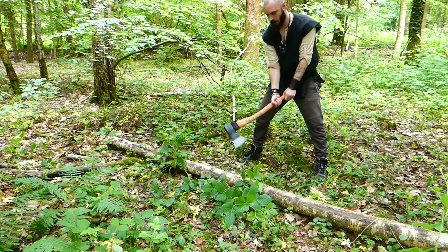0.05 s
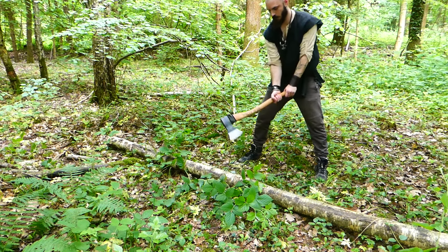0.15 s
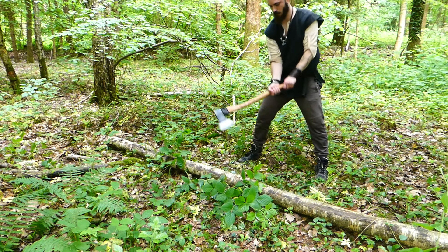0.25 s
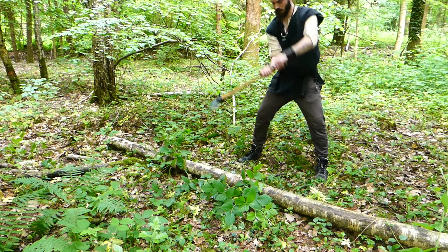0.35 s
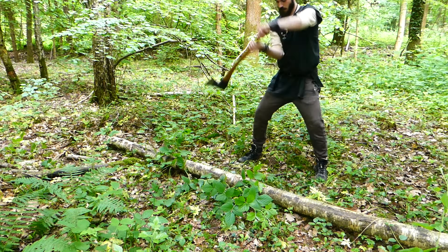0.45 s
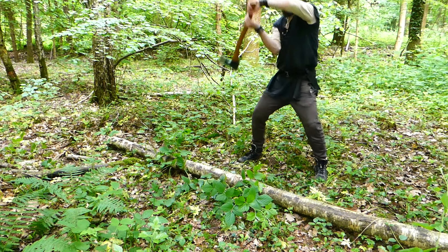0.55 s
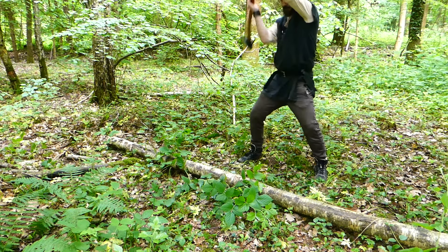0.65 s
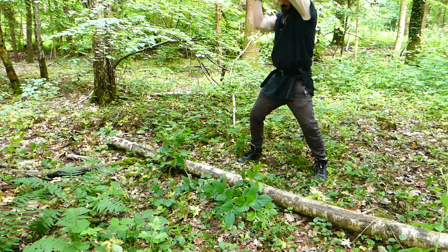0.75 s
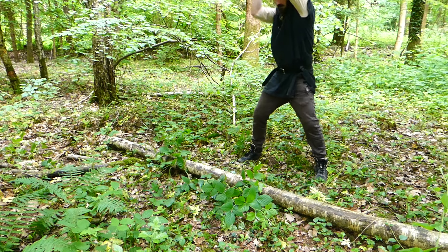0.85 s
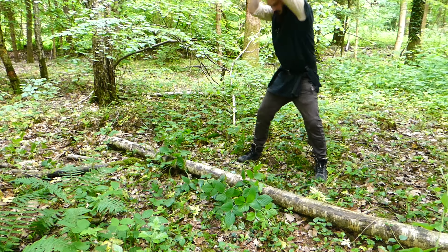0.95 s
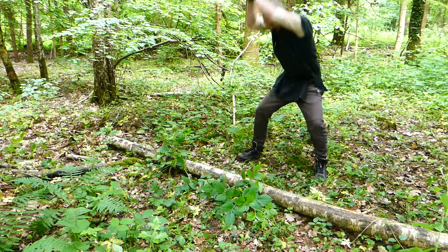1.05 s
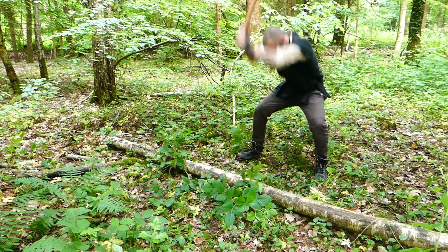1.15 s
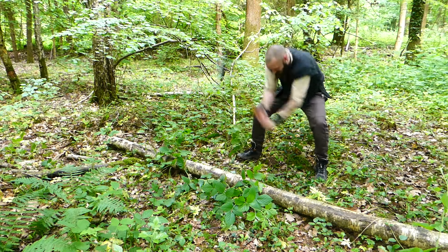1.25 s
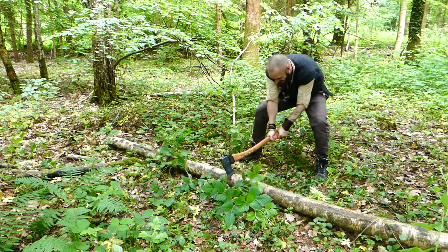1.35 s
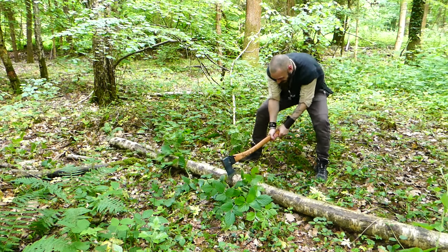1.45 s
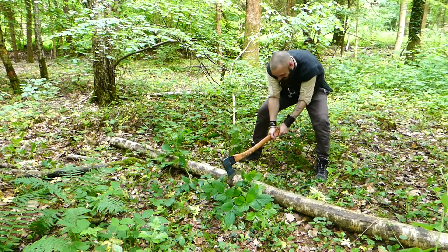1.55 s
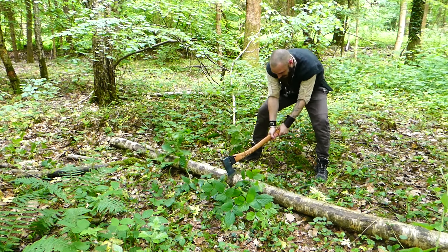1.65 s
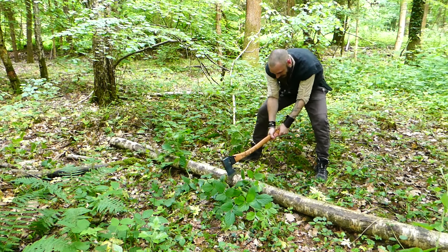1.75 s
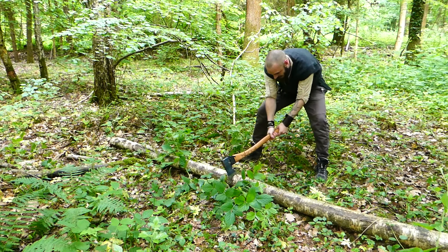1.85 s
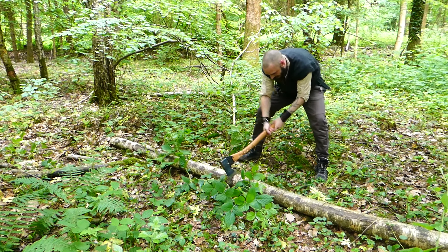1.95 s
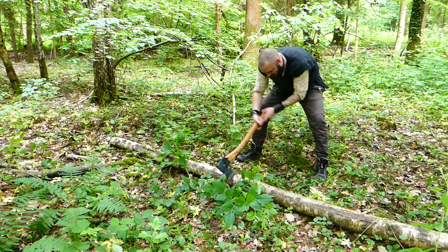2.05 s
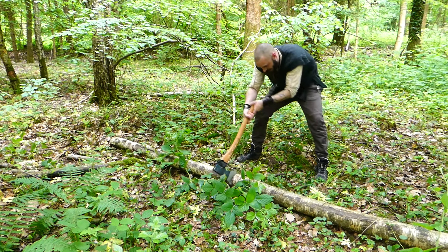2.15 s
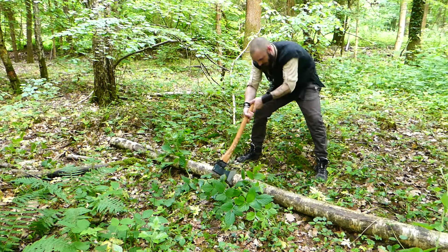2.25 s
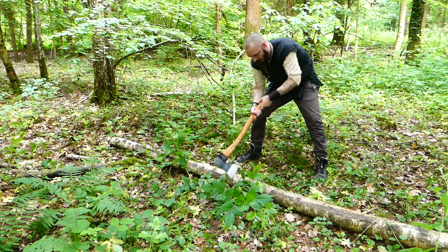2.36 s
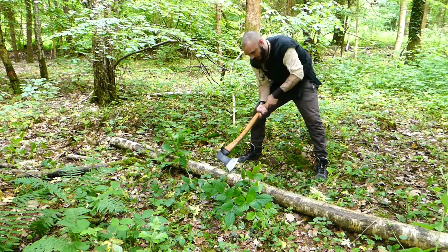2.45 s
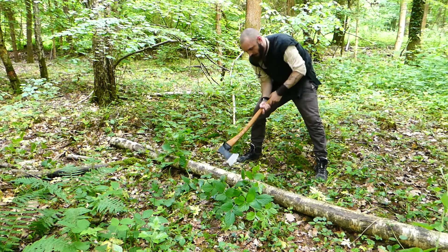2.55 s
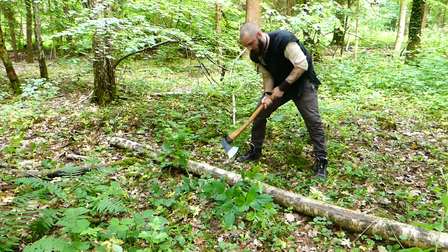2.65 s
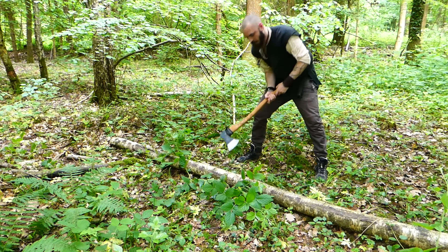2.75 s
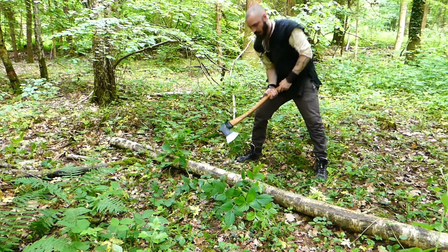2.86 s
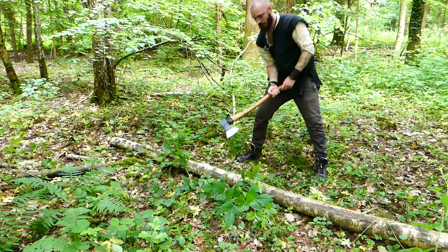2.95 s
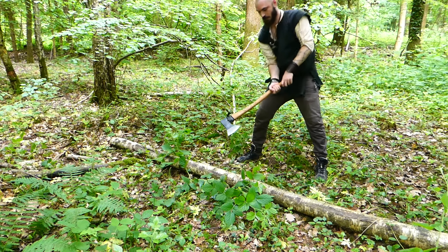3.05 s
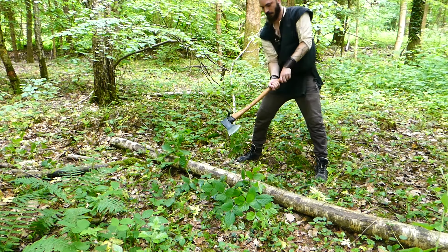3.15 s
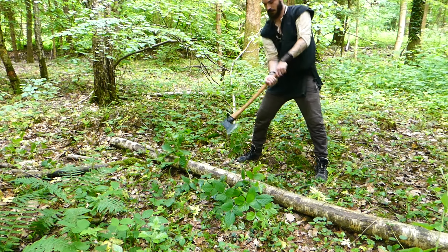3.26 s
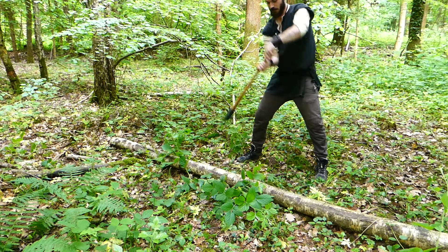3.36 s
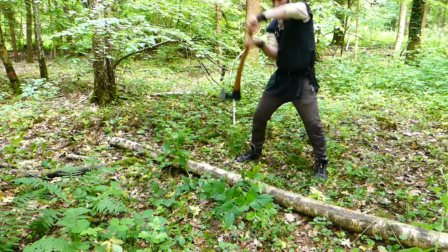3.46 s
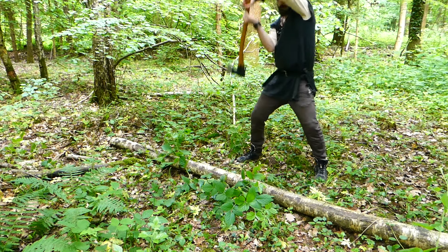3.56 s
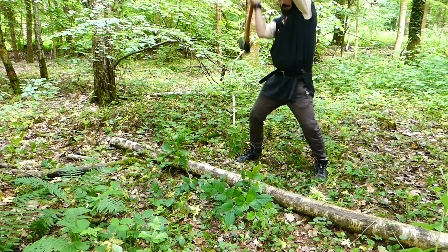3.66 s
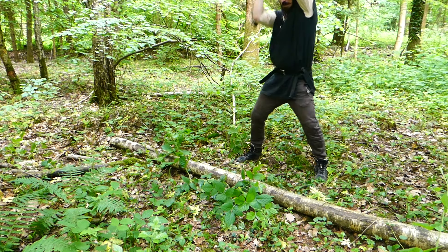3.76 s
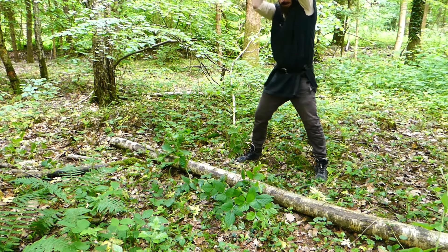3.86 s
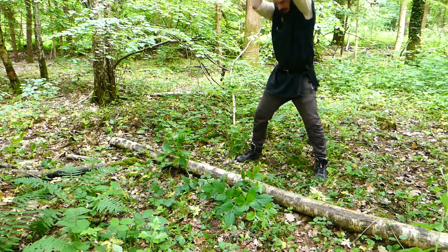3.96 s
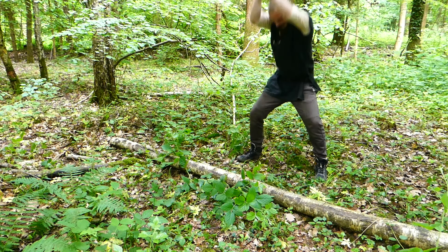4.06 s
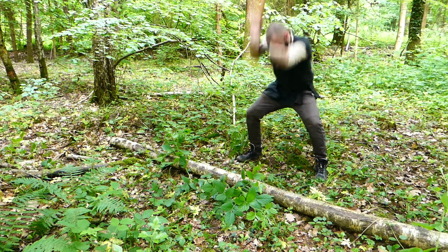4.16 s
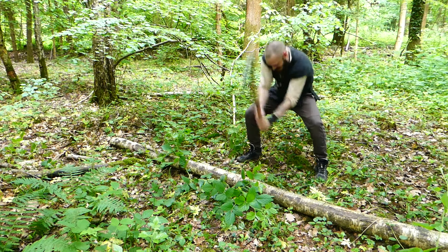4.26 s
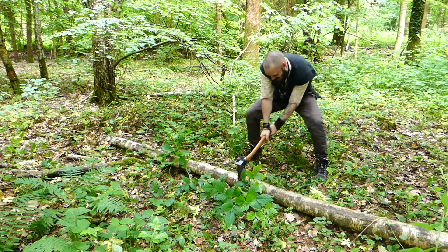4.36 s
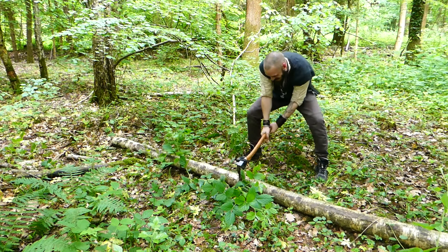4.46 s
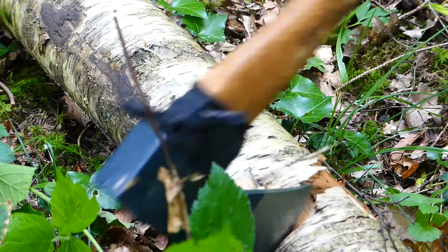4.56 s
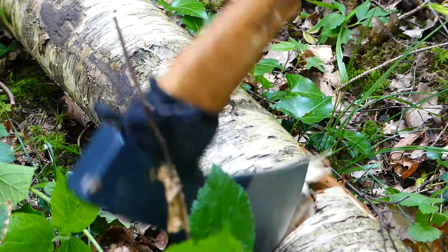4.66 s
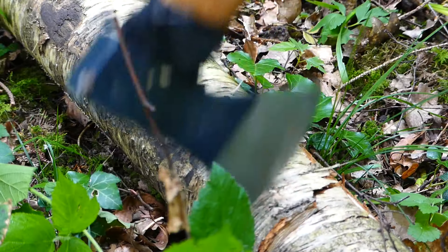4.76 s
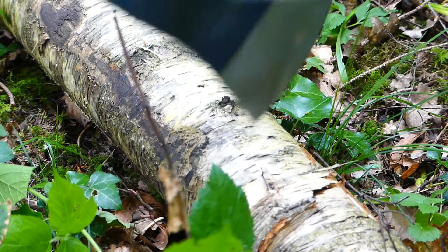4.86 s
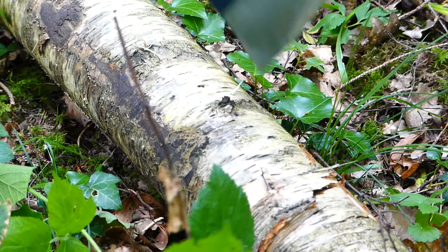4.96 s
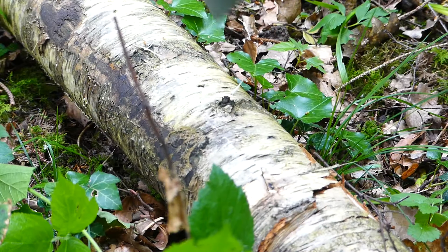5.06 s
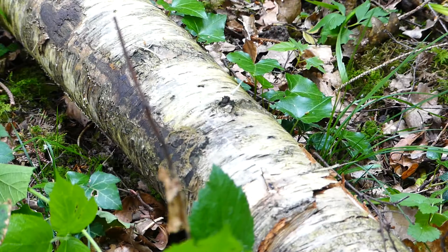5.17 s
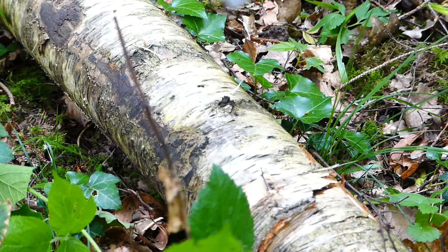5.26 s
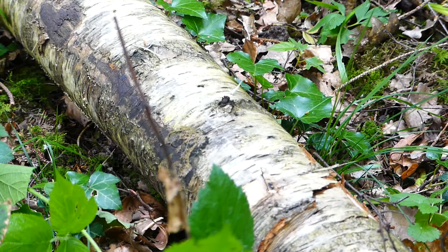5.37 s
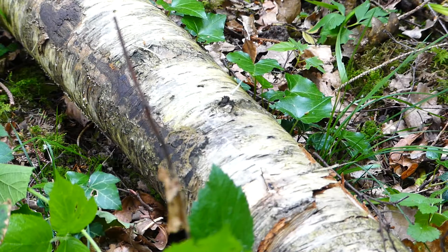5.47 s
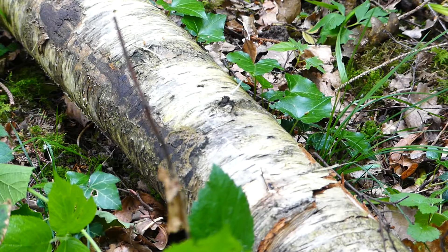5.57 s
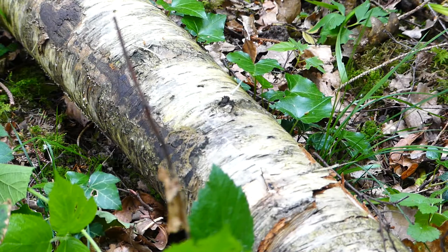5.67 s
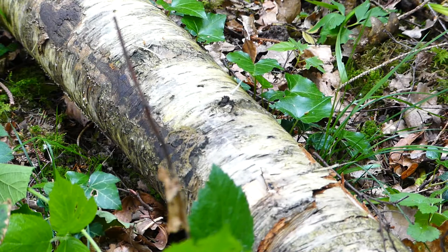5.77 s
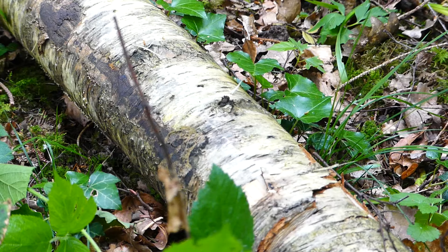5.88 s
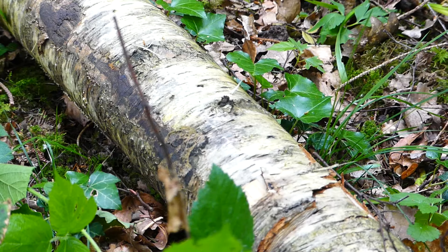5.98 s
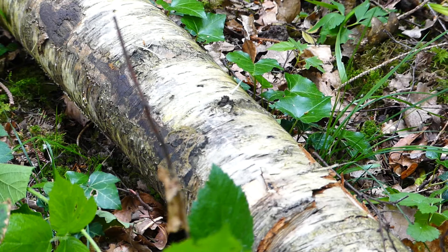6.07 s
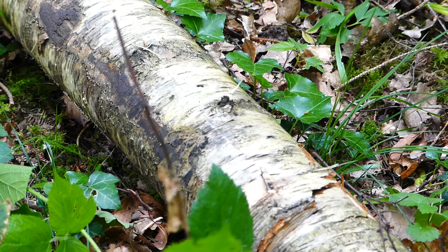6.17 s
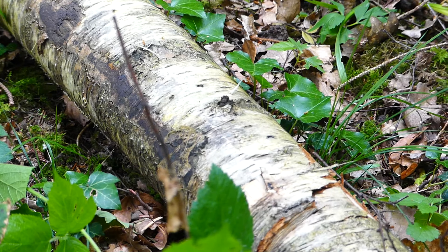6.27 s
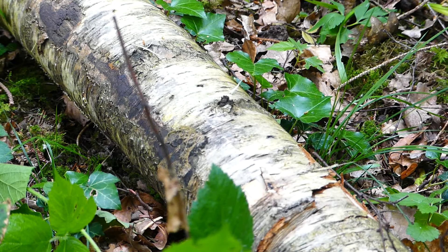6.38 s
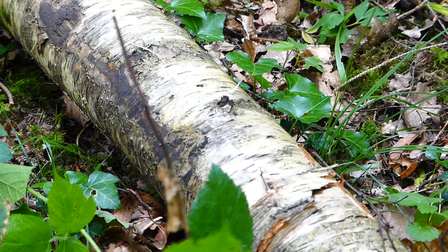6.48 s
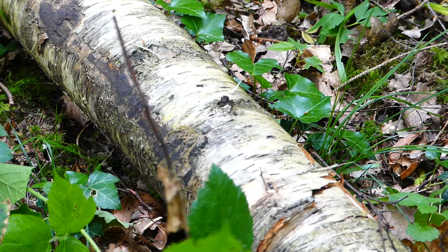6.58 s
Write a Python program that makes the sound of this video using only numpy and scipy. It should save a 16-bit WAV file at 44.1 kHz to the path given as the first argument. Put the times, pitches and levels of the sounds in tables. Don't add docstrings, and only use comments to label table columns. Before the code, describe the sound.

Quiet woodland air with thin bird trills and whistles, then a loud axe chop that knocks, rings briefly and scatters among the trees. Chips patter, leaves scrape softly, doves coo faintly. A second, fuller-ringing chop follows, cut off abruptly by a change to a close microphone, where dry leaves crackle, a twig snaps sharply and birds chatter brightly, with a faint far traffic murmur beneath.

```python
import sys
import numpy as np
from scipy import signal
from scipy.fft import rfft, irfft
from scipy.io import wavfile
from scipy.ndimage import uniform_filter1d

SR = 44100
rng = np.random.default_rng(int(sys.argv[2]) if len(sys.argv) > 2 else 0)


def volts(x):
    e = np.asarray(x, float) / 20
    return 10 ** e


def to_wav(s):
    ch = np.atleast_2d(s).T
    pcm = np.round(np.clip(ch, -1, 1) * 32767)
    wavfile.write(sys.argv[1], SR, pcm.astype(np.int16))


N = 291942
CUT_S = 4.556


def evened(x):
    return x / np.sqrt(np.mean(x ** 2) + 1e-20)


def read(points, hz):
    f, value = np.transpose(points)
    return np.interp(np.log(hz + 1), np.log(f + 1), value)


def add(mix, s, sound):
    part = mix[..., round(s * SR):][..., :sound.shape[-1]]
    part += sound[..., :part.shape[-1]]


def colour(x, points):
    size = x.shape[-1]
    gain = volts(read(points, np.fft.rfftfreq(size, 1 / SR)))
    return irfft(rfft(x) * gain, size)


def pair(x, same):
    same = np.clip(same, 0, 1)
    mid = np.sqrt((1 + same) / 2) * x[0]
    side = np.sqrt((1 - same) / 2) * x[1]
    return np.array([mid + side, mid - side])


def scatter(decays, start, size):
    hz, t, z = signal.stft(rng.standard_normal((2, size)), SR, nperseg=256)
    decay = volts(-60 * t / read(decays, hz)[:, None])
    tail = signal.istft(z * decay, SR, nperseg=256)[1][:, :size]
    tail = tail * np.clip(np.arange(size) / SR / start, 0, 1)
    return tail / np.linalg.norm(tail[0])


def log_ring(after, modes, lodge_s, step):
    choke_db, rocking_db = -6.5, 3
    turn = 0.025 * rng.standard_normal((len(modes), 1, 1)) * [[1], [-1]]
    choke = choke_db / (1 + np.exp(np.clip((lodge_s - after) / 0.00056, -30, 30)))
    rock = uniform_filter1d(rng.standard_normal((len(modes), SR)), size=600)
    rock = rocking_db * evened(uniform_filter1d(rock, size=600)) * np.minimum(after / .04, 1)
    ring = 0
    for k, (hz, db, t60) in enumerate(modes):
        level = volts(rock[k] + db - 60 * after / t60 + choke * min(hz / 500, 1))
        wave = np.sin(2 * np.pi * (hz * after + turn[k] + k * step))
        ring = ring + level * wave * (1 - np.exp(-after * hz / 0.43))
    return ring


def trunk_echo(direct, after):
    # frequency in Hz, decay time t60 in s.
    woods = [(100, 1.3), (300, 2.2), (700, 2.6), (1500, 2.3), (4000, 3.3), (12000, 0.47)]
    # frequency in Hz, level in dB.
    echo_spectrum = [(60, -30), (150, 5), (400, -6), (850, -1), (1500, -1), (3500, 3), (10000, 1),
                     (16000, -8)]
    knock = direct[:, :700] * volts(-60 * after[:700] / .055)
    knock = colour(knock, [(1200, -1.5), (2500, -16), (5000, -26)])
    crack = colour(signal.unit_impulse(700, 200), [(1000, -23), (2500, 1.5), (6000, -2), (16000, -6)])
    trunks = pair(colour(scatter(woods, 0.059, SR), echo_spectrum), 0.87)
    tail = signal.fftconvolve(knock + volts(9) * crack, trunks, axes=1)[:, :SR]
    tail = tail * np.clip((1 - np.arange(SR) / SR) / .3, 0, 1)
    return volts(-28) * tail / abs(tail).max()


def blow(strike, row, modes, thump):
    # frequency in Hz, level in dB per Hz.
    crack_spectrum = [(470, -4), (800, -2.5), (1300, -12.5), (4930, -19.5), (5510, -20), (6650, -20.5),
                      (11100, -23), (16000, -28)]
    s, lead_s = strike
    ring_db, crack_db, lead_db, lodge_s, pan_db, step = row
    thump_hz, thump_db, thump_s = thump
    t = np.arange(SR) / SR - lead_s
    after = np.maximum(t, 0)
    ring = log_ring(after, modes, lodge_s, step)

    noise = pair(rng.standard_normal((2, SR)), 0.88)
    noise = evened(colour(noise, [(300, -11)] + list(crack_spectrum)))
    crack = volts(crack_db + 7.0 - 60 * after / 0.0056) * after / 0.0011
    crack = crack + volts(crack_db - 20.0 - 60 * after / 0.044)
    crack = crack + volts(crack_db - 21 - 60 * after / 0.16)
    bark = colour(noise, [(500, -18), (1500, 0.5)]) * volts(lead_db) * (t <= 0)
    direct = volts(ring_db) * ring / abs(ring).max() + noise * crack * (t > 0) + bark

    push = np.sin(2 * np.pi * thump_hz * after) * np.minimum(after / .001, 1)
    direct = direct + volts(thump_db - 60 * after / thump_s) * push
    direct = colour(direct, [(50, -38), (130, 0.5)])
    direct = direct * np.clip((.8 - np.arange(SR) / SR) / .3, 0, 1)
    panned = direct * volts([[pan_db / 2], [-pan_db / 2]])
    return s - lead_s, panned + trunk_echo(direct, after)


def axe_blows():
    # impact in seconds, bark-splitting lead in s.
    strikes = [
        (1.3489, .0038),
        (4.3494, .002),
    ]
    # ring peak in dB, crack in dB, lead in dB, time until the blade lodges in s,
    # left-right difference in dB, phase step from mode to mode in turns.
    blows = [
        (-2.5, -3.5, -25, 0.011, -1.3, 0.0023),
        (0.5, -5, -27, 0.0097, -.3, 0.498),
    ]
    # frequency in Hz, level in dB, decay time t60 in s.
    log_modes = [
        [(151.3, -23, 0.4), (176, -17, 0.22), (242.5, -12.5, 0.25), (346, -11, 0.14), (486, -4, 0.083),
         (623, -2.5, 0.06), (740, -5, 0.046), (880, 1, 0.059), (1160, -6, 0.034), (1757, -4.5, 0.022),
         (1320, -9, 0.025), (2737, -4.5, 0.014), (3380, -8.5, 0.015), (1010, -6, 0.03)],
        [(148.4, -26, 0.53), (164.6, -23.5, 0.25), (233, -23.5, 0.34), (392, -9.5, 0.058), (456, -1, 0.078),
         (617, .5, 0.064), (700, -14, 0.066), (900, -13.5, 0.037), (1146, -14, 0.057), (1330, -14, .04),
         (1520, -16.5, 0.053), (2240, -9.5, 0.015), (5360, -10, 0.012), (7670, -14, 0.0099)],
    ]
    # frequency in Hz, level in dB, decay time t60 in s.
    thumps = [
        (560, -2, .018),
        (560, -20, .012),
    ]
    out = np.zeros((2, N))
    for parts in zip(strikes, blows, log_modes, thumps):
        add(out, *blow(*parts))
    return out * (np.arange(N) < CUT_S * SR)


def snaps():
    # start in seconds, peak in dB, pitch in Hz.
    twigs = [(0.7033, -30.5, 9500), (1.1781, -37, 7070), (3.1036, -26, 7000), (3.2903, -33, 4300),
             (5.252, -25, 12000), (5.785, -14, 4580), (5.973, -32, 12400)]
    # start in seconds, peak in dB, pitch in Hz.
    chips = [(0.811, -34, 2230), (1.6385, -25, 2190), (1.656, -19, 5260), (2.074, -35, 2660),
             (2.48, -29, 2240), (2.86, -31.5, 2180), (4.4811, -20, 4060), (4.4812, -27, 2450),
             (1.6383, -24, 500), (1.6385, -29, 3100), (5.7084, -20, 3500), (5.843, -23, 3740)]
    # start in seconds, peak in dB, pitch in Hz, ring t60 in s.
    knocks = [(1.9, -48, 230, 0.054), (4.282, -34.5, 340, 0.08), (4.6049, -29, 1720, 0.03),
              (4.605, -27, 1400, .012), (4.605, -36, 950, .015), (5.7853, -23.5, 620, 0.012),
              (5.591, -29, 1900, .012), (5.166, -35.5, 830, .015), (5.542, -33, 1310, .012),
              (5.64, -35, 510, .02), (6.305, -35, 1100, 0.014), (3.1168, -38, 8930, 0.058),
              (.135, -50, 9000, .04), (.557, -49, 8900, .04), (6.372, -33, 630, .02),
              (2.25, -40, 384, 0.074), (5.1, -38, 870, .012)]
    # start in seconds, peak in dB.
    ticks = [(0.6125, -38), (1.8776, -40), (2.1415, -37), (2.2498, -39), (2.3444, -38), (2.8474, -46),
             (4.2896, -34), (5.02, -30), (5.1174, -32), (5.3514, -37), (5.4829, -28), (5.655, -27),
             (5.8935, -37), (5.9284, -40), (5.9913, -36), (6.1624, -32), (6.1784, -30), (6.2904, -30),
             (6.3021, -28), (6.3074, -20), (6.4724, -41), (6.4934, -42), (6.5444, -36)]
    snap_t60_s, tick_db = 0.0059, 2.5
    events = [(*r, snap_t60_s, 0.59) for r in twigs]
    events += [(*r, snap_t60_s, 0.26) for r in chips]
    events += [(*r, 0.11) for r in knocks]
    out, t = np.zeros((2, N)), np.arange(4000) / SR
    for s, db, hz, t60, share in events:
        crack = pair(rng.standard_normal((2, len(t))), .7) * volts(-60 * t / .004)
        crack = np.diff(crack, prepend=0) * .7
        ring = np.sin(2 * np.pi * hz * t) * volts(-60 * t / t60) * (1 - np.exp(-t / 0.00014))
        add(out, s, volts(db) * (share * crack + (1 - share) * ring))
    for s, db in ticks:
        crack = np.diff(pair(rng.standard_normal((2, 301)), .7)) / 2
        add(out, s, volts(db + tick_db - 60 * t[:300] / .005) * crack)
    return out


def stirring(column):
    # peak in seconds, rise in s, fall in s, leaf in dB, scrape in dB.
    stirs = [(.615, .25, .08, -61.5, -65), (.706, 0.039, 0.084, -54.5, -60), (.81, 0.032, .12, -57.5, -61),
             (1.03, .2, 0.47, -58, -57), (1.18, .1, .4, -62, -64), (1.56, 0.33, 0.26, -59, -40),
             (1.66, 0.053, 0.11, -44, -38.5), (1.76, 0.12, 0.77, -64, -48), (2.13, 0.16, 0.41, -59, -55),
             (2.27, 0.083, 0.092, -61, -56), (2.355, 0.032, 0.12, -48, -51.5),
             (2.48, 0.023, .06, -55.5, -56), (2.86, 0.031, 0.067, -57, -52), (3.112, .012, 0.044, -56, -65),
             (3.45, .5, .1, -67, -66), (3.57, .1, 0.64, -64, -62), (4.29, 0.13, 0.032, -59, -54),
             (4.54, 0.2, 0.25, -46, -40.5)]
    # peak in seconds, rise in s, fall in s, leaf in dB, scrape in dB.
    steps = [(4.7, 0.27, 0.14, -61, -49.5), (5.02, 0.37, 0.53, -48, -54), (5.15, 0.29, 0.2, -47, -48.5),
             (5.24, 0.24, 0.065, -49, -64), (5.37, 0.12, 0.32, -44.5, -43), (5.49, 0.11, 0.29, -39, -42),
             (5.665, 0.059, 0.16, -39, -38.5), (5.794, .01, 0.03, -41.5, -60), (5.76, 0.11, 0.18, -46, -64),
             (6.17, 0.057, 0.13, -51, -46), (6.23, 0.13, 0.085, -39, -41.5),
             (6.31, 0.038, 0.14, -37.5, -39.5), (6.5, .2, .9, -62, -60)]
    fade_db, rest_db = -22, -81
    t, power = np.arange(N) / SR, volts(2 * rest_db)
    for table, heard in ((stirs, t < CUT_S), (steps, t >= CUT_S)):
        for s, rise, fall, *db in table:
            away = np.maximum((s - t) / rise, (t - s) / fall)
            power = power + heard * volts(2 * (db[column] + fade_db * away))
    return np.sqrt(power)


def rustle():
    # frequency in Hz, level in dB per Hz.
    leaf_spectrum = [(880, -12.5), (1500, -11), (1760, -12), (1920, -6.5), (2590, -3), (9850, -3.5),
                     (14900, -7), (16000, -32)]
    cracks_per_s, flicker_db = 5000, 1.3
    cracks = volts(3.8 * np.minimum(rng.exponential(1, (2, N)), 3.8))
    cracks = cracks * (rng.random((2, N)) < cracks_per_s / SR)
    cracks = evened(cracks * rng.standard_normal((2, N))) + rng.standard_normal((2, N))
    clumps = evened(uniform_filter1d(rng.standard_normal(N), size=500))
    cracks = cracks * volts(flicker_db * clumps)
    leaf = evened(colour(pair(cracks, 0.81), [(600, -63.0)] + list(leaf_spectrum)))
    scrape_spectrum = [(250, -17.0), (500, -3.0), (1000, -4.0), (1800, -7.5), (3000, -21)]
    scrape = evened(colour(pair(cracks[:, ::-1], 0.4), scrape_spectrum))
    return volts(4.0) * stirring(column=0) * leaf + volts(-1.5) * stirring(column=1) * scrape


def whistle(length, first_hz, last_hz, glide, db, swell_db=0):
    t = np.arange(0, length, 1 / SR)
    hz = last_hz + (first_hz - last_hz) * np.exp(-t / glide)
    level = volts(db + 7.5 - swell_db * (1 - t / length))
    return level * np.sin(2 * np.pi * np.cumsum(hz) / SR) * signal.windows.tukey(len(t), .35)


def trill(length, hz, sweep_hz, db, haste=1, taper=.2):
    base_per_s, per_khz, sag = 9, 35.06, .012
    t = np.arange(0, length, 1 / SR)
    noise = rng.standard_normal(SR)
    wander, drift = (evened(uniform_filter1d(noise, size=size))[:len(t)] for size in (400, 4000))
    beat = (haste * (base_per_s + per_khz * sweep_hz / 1000) * t + .25 * wander) % 1
    pitch = hz * (1 + sag * drift) + sweep_hz * (.5 - beat + 0.1023 * wander)
    notes = np.sin(2 * np.pi * np.cumsum(pitch) / SR) * np.sqrt(np.sin(np.pi * beat))
    return volts(db + 5.5 + 1.3 * wander) * notes * signal.windows.tukey(len(t), np.clip(taper, 0, 1))


def finch(near):
    fall_s, fall_gap_s, fall_db, fall_gain_db = 4.831, .1153, -44.5, 0.37
    rise_s, rise_gap_s, rise_db = 5.509, .1262, -46.5
    for k in range(5):
        s, db, sag_hz = fall_s + k * fall_gap_s, fall_db + k * fall_gain_db, k * 59.6
        top_hz, bottom_hz = 5800 * rng.uniform(0.92, 1.05), 3480 * rng.uniform(0.97, 1.02)
        pip_hz = 4050 * rng.uniform(0.99, 1.03) - sag_hz
        add(near, s - .011, whistle(0.011, 4770, 5600, .01, db - 6.5))
        add(near, s, whistle(0.021, top_hz, bottom_hz, 0.0055, db))
        add(near, s + 0.0244, whistle(0.018, pip_hz, 4110 - sag_hz, 0.019, db - 0.5))
        rise = whistle(0.025, 2395, 3680, 0.007, rise_db + 3.5, swell_db=7.5)
        add(near, rise_s + k * rise_gap_s, rise)


def birds():
    # start in seconds, length in s, first pitch in Hz, last pitch in Hz, level in dB.
    canopy = [(0.168, 0.032, 6800, 5250, -62.5), (.195, .03, 5300, 4700, -66),
              (0.238, 0.054, 4680, 4550, -65.5), (0.505, 0.037, 6300, 3880, -59),
              (0.552, .022, 3800, 4180, -64), (.574, .03, 4150, 3550, -72), (0.868, 0.069, 5960, 3880, -62),
              (1.028, 0.07, 4650, 4520, -68), (2.405, 0.046, 3770, 3840, -67),
              (2.51, 0.076, 3870, 3860, -74), (2.677, 0.044, 3990, 4224, -57.5),
              (2.876, 0.022, 4000, 4300, -58), (2.9, .03, 4300, 4136, -60), (3.13, 0.05, 3770, 4420, -60.5),
              (3.852, 0.036, 2600, 2200, -63), (4.665, 0.055, 1690, 1654, -60),
              (4.70, 0.024, 6800, 6770, -63), (4.8, .025, 6000, 6150, -63), (5.03, .02, 5600, 6100, -57)]
    # start in seconds, length in s, first Hz, last Hz, dB.
    pips = [(4.579, 0.021, 5180, 4780, -52), (4.669, 0.034, 3105, 2610, -53.5),
            (4.695, 0.018, 3970, 3840, -45), (4.725, 0.021, 5230, 4920, -49),
            (4.774, 0.018, 3950, 3970, -51), (3.662, 0.024, 3330, 2800, -61),
            (4.997, 0.026, 2680, 2730, -49.5), (5.399, 0.022, 3100, 2400, -50.5),
            (5.468, 0.025, 3900, 2600, -46.5), (5.452, .012, 3300, 4000, -49),
            (5.607, .014, 3200, 2300, -48), (5.922, .014, 2600, 2100, -54), (5.582, 0.021, 2960, 2600, -49),
            (5.866, .02, 2700, 2760, -54), (5.95, .014, 2280, 2200, -58), (5.104, .012, 3950, 3950, -49),
            (6.108, .014, 4600, 7000, -58), (5.384, .016, 3300, 2900, -53), (5.928, .014, 3500, 3400, -53),
            (5.912, .012, 2900, 3300, -53), (6.04, 0.011, 2800, 3400, -52), (5.643, .03, 2500, 2650, -49),
            (5.845, 0.013, 2750, 2780, -49.5), (5.988, 0.018, 3000, 2250, -50),
            (5.972, .008, 4300, 5400, -53), (5.978, .009, 5100, 1500, -54), (6.035, 0.006, 3700, 5500, -56),
            (5.73, 0.014, 3220, 2600, -49), (6.33, 0.016, 3500, 4370, -44)]
    # start in seconds, length in s, first Hz, last Hz, dB.
    coos = [(2.505, 0.063, 265, 275, -64), (2.63, 0.085, 281, 291, -63), (2.75, 0.09, 285, 292, -63),
            (2.86, .07, 300, 309, -64), (2.955, 0.047, 274, 270, -63), (2.58, .13, 453, 458, -63),
            (3.41, .1, 643, 626, -70), (3.545, 0.12, 631, 622, -68), (3.68, .11, 622, 610, -67.5)]
    # start in seconds, length in s, centre in Hz, sweep in Hz, level in dB.
    trills = [(3.38, .17, 3480, 400, -68), (3.91, 0.11, 4250, 400, -66), (3.8, .12, 3050, 250, -68),
              (0.02, 0.62, 7300, 300, -67), (.08, .56, 6950, 700, -68), (.58, .76, 7150, 800, -63),
              (.67, .05, 7700, 300, -64), (1.0, .14, 7900, 900, -68), (.78, .05, 7800, 500, -64),
              (.91, .1, 7850, 600, -67), (1.14, .2, 7700, 400, -67), (.12, 0.32, 1950, 490, -65),
              (0.35, .34, 2250, 370, -69.5), (0.84, 0.57, 2200, 400, -68), (2.772, 0.073, 2850, 670, -60),
              (2.84, .11, 3100, 400, -64.5), (2.97, 0.118, 2830, 600, -60), (3.095, .18, 2780, 660, -64),
              (2.975, 0.16, 4120, 500, -61), (3.19, 0.13, 4250, 700, -64), (3.5, .18, 3450, 400, -72),
              (3.41, .17, 7350, 420, -63), (3.57, .3, 6780, 800, -60), (3.88, 0.265, 2130, 270, -64)]
    # start in seconds, length in s, centre Hz, sweep Hz, dB.
    chorus = [(4.558, 0.24, 3810, 450, -53), (4.91, 0.1, 3800, 500, -53), (5.01, .12, 3850, 600, -54),
              (5.13, .17, 3850, 400, -51), (4.56, 0.27, 4950, 399, -57), (4.79, 0.1, 3140, 300, -57),
              (5.02, 0.18, 2940, 402, -52), (5.17, 0.22, 3260, 500, -51), (5.3, 0.19, 3800, 301, -49.5),
              (4.93, 0.4, 5310, 1507, -55), (5.4, .42, 3500, 600, -54), (5.82, .3, 3400, 700, -59),
              (5.55, .27, 2750, 700, -53), (5.87, .2, 2250, 800, -58), (5.85, .2, 2750, 500, -58),
              (5.55, .06, 4300, 400, -53), (6.13, .22, 5600, 1600, -48.5), (5.4, .7, 3000, 1100, -59),
              (5.5, .1, 4300, 700, -55), (5.97, .14, 3300, 700, -62)]
    # start in seconds, length in s, centre Hz, sweep Hz, dB.
    rattle = [
        (3.915, .17, 3200, 600, -55),
        (4.01, .26, 3300, 1050, -52.5),
        (4.15, .21, 3050, 750, -55),
    ]
    # start in seconds, length in s, centre Hz, sweep Hz, dB.
    flourish = [(6.13, .035, 4950, 500, -3), (6.338, .045, 4200, 1200, 1), (6.375, .065, 3250, 1100, -3),
                (6.422, .105, 4550, 1300, 0), (6.52, .1, 4300, 1200, -11), (6.45, .1, 3000, 700, -18)]
    rattle_db, flourish_db, pan_db = 0.5, -42.5, 4.5
    near, far = np.zeros(N), np.zeros(N)
    for notes, glide_s in ((canopy, .0055), (pips, .012), (coos, .05)):
        for s, length, first_hz, last_hz, db in notes:
            add(near, s, whistle(length, first_hz, last_hz, glide_s, db))
    finch(near)
    for s, *phrase in list(trills) + list(chorus):
        add(far, s, trill(*phrase))
    for s, *phrase in rattle:
        add(far, s, volts(rattle_db) * trill(*phrase, haste=1.55, taper=.4))
    for s, *phrase in flourish:
        add(far, s, volts(flourish_db) * trill(*phrase, haste=2.2))
    trunks = pair(scatter([(1000, 0.49), (9000, 0.38)], 0.0033, SR // 2), 0.77)
    echo = signal.fftconvolve((volts(-2) * near + far)[None], trunks, axes=1)[:, :N]
    return near * volts([[pan_db / 2], [-pan_db / 2]]) + 0.8 * far + echo


def hush():
    # frequency in Hz, level in dB per Hz.
    air_spectra = [
        [(20, -43), (134, 1), (650, -0.5), (1560, -17), (2990, -13.5), (7700, -21.5), (10100, -22),
         (16000, -29)],
        [(20, -24), (153, -5), (405, -3), (1950, -16), (3650, -5), (7500, -22.5), (12500, -17.5), (16000, -26)],
    ]
    air_db = [
        -50,
        -47,
    ]
    # frequency in Hz, left-right likeness from 0 to 1.
    likeness = [(40, .1), (90, 0.064), (200, 0.041), (1000, 0.043), (5000, 0.82), (15000, 0.51)]
    # time in seconds, level in dB.
    murmur = [(0.0, -52.5), (0.4, -56), (0.7, -50), (1.1, -66), (1.55, -55), (2.16, -66), (2.86, -54.5),
              (3.23, -70), (4.48, -57), (5.0, -70), (6.23, -56), (6.62, -71)]
    frames, hz = N // 256 + 5, np.fft.rfftfreq(1024, 1 / SR)
    a, b, c, d, patches = rng.standard_normal((frames, 513, 5)).T
    patches = evened(uniform_filter1d(uniform_filter1d(patches, 12, 0), 14, 1))
    z = pair(np.array([a + 1j * b, c + 1j * d]), read(likeness, hz)[:, None]) * volts(patches)
    beds = []
    for spectrum, db in zip(air_spectra, air_db):
        shaped = z * volts(read(spectrum, hz))[:, None]
        bed = signal.istft(shaped, nperseg=1024, noverlap=768)[1][:, :N]
        beds.append(volts(db) * evened(bed))
    t = np.arange(N) / SR
    low = pair(rng.standard_normal((2, N)), 0.16)
    low = evened(colour(low, [(55, -27), (95, -12.5), (150, 1), (220, -20), (400, -34)]))
    swell = volts(np.interp(t, *np.transpose(murmur)) - 5.5)
    return np.where(t < CUT_S, *beds) + swell * low


def scene():
    return axe_blows() + snaps() + rustle() + birds() + hush()


def roll_off(x):
    return signal.sosfilt(signal.butter(12, 16480, fs=SR, output="sos"), x)


def record(dry):
    # frequency in Hz, level in dB.
    microphone = [(20, -12), (110, 0), (7400, 0), (7520, -10), (7640, 0), (15600, 0), (15900, -22),
                  (16300, -45), (17000, -70)]
    mix = np.clip(colour(dry, microphone), -1, 1)
    return roll_off(mix)


dry = scene()
out = record(dry)
to_wav(out)
```